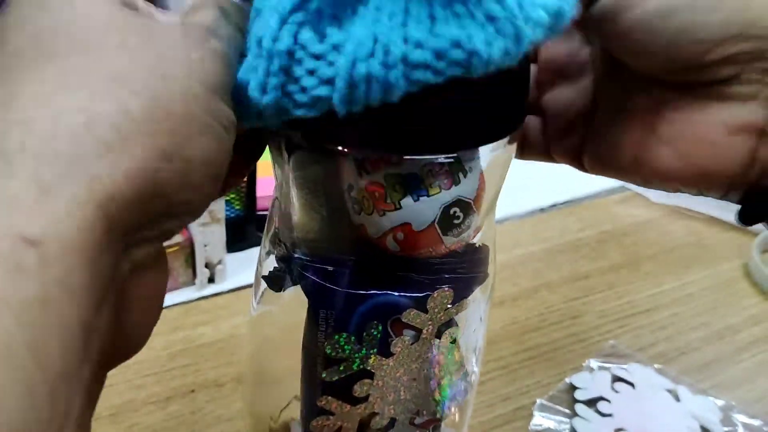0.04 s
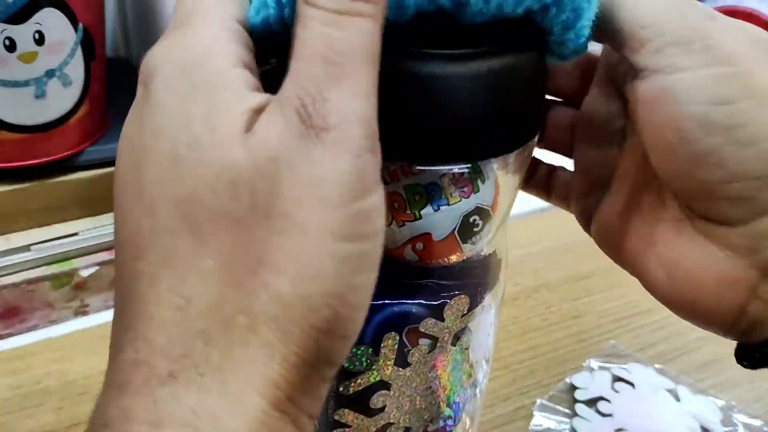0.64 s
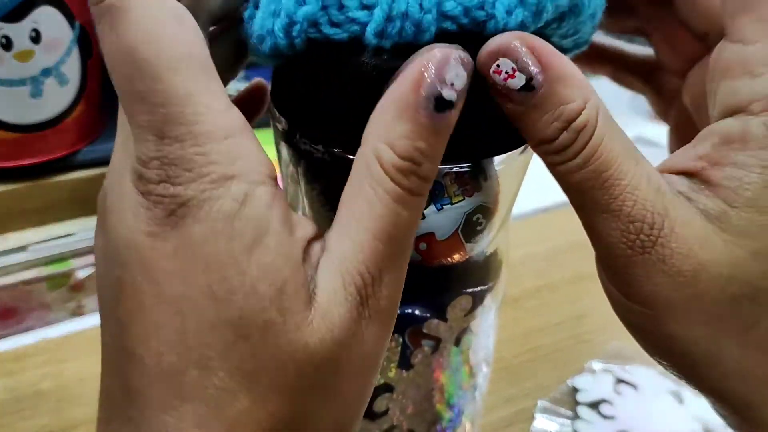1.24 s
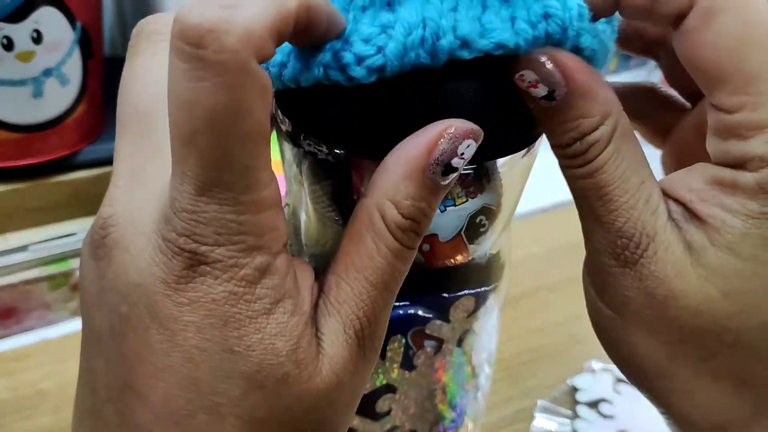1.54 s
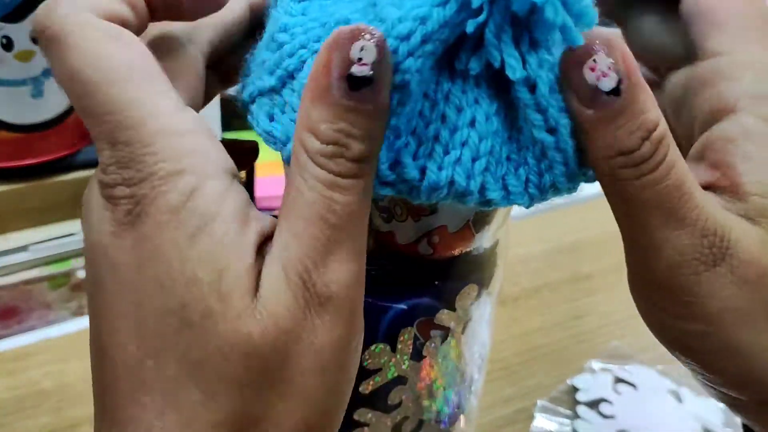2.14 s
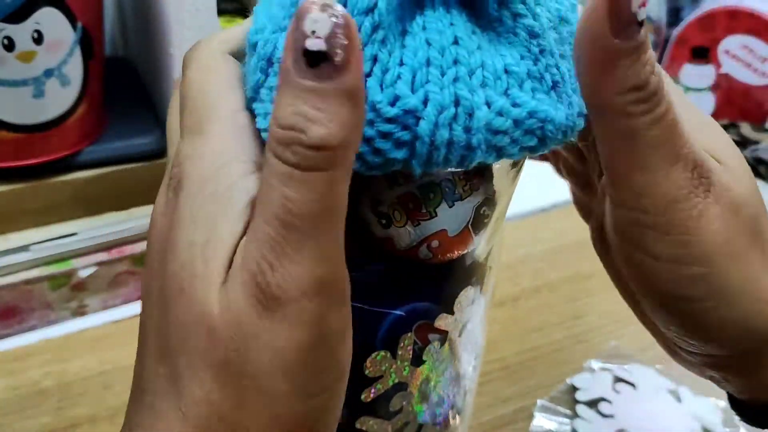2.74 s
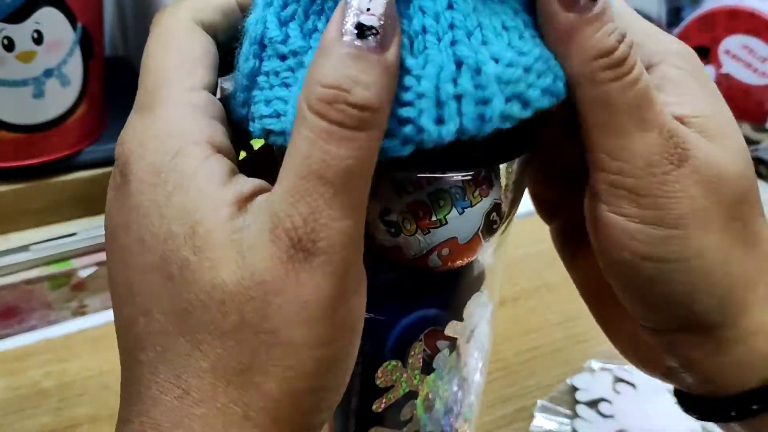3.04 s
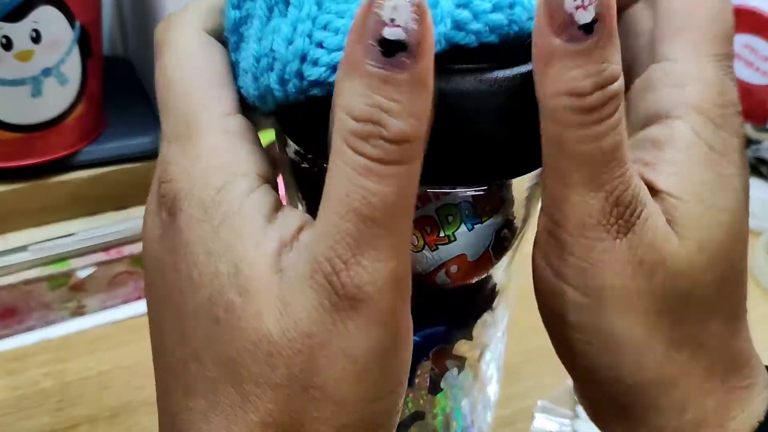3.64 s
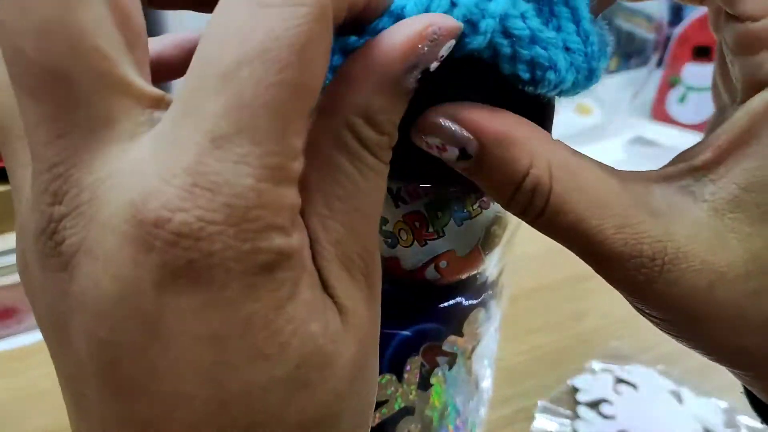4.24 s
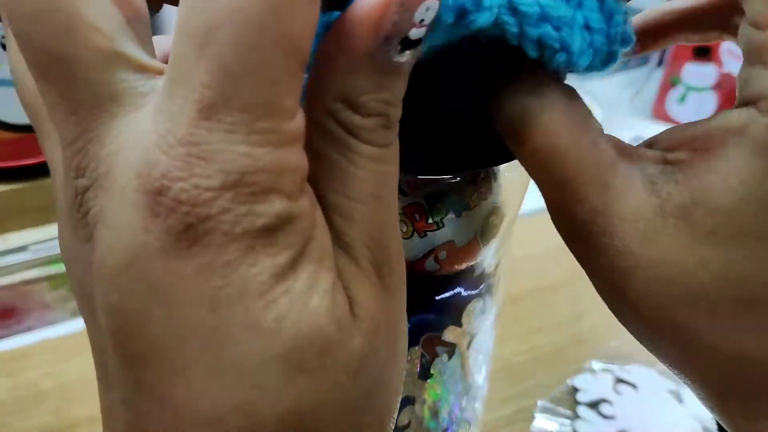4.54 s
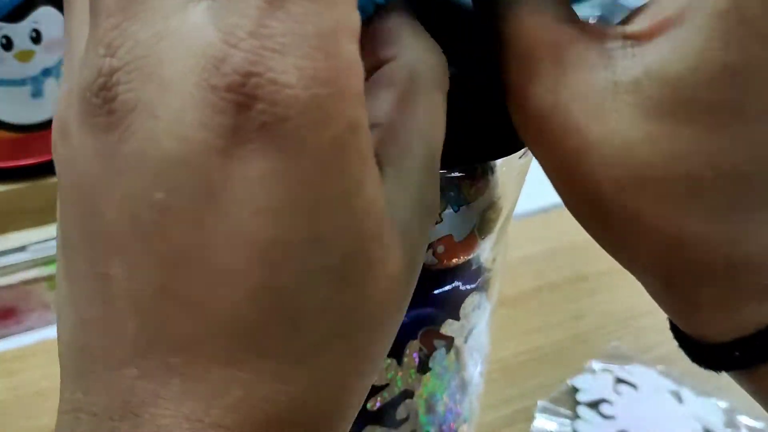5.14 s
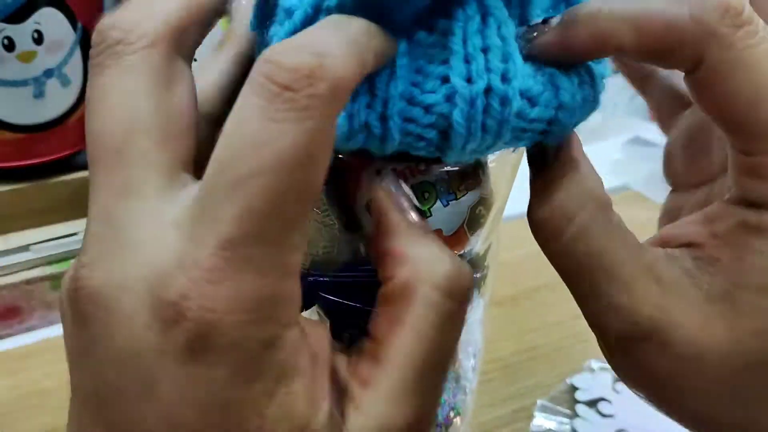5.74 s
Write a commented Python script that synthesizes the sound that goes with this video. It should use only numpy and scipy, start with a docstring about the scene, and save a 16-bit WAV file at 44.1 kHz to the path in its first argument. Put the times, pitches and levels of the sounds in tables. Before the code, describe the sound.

A jar wobbles on a desk in clusters of light thuds as a knitted cap softly rustles and fingernails click.

```python
"""Two hands tug a knitted wool cap over the plastic lid of a tall jar on a wooden desk, close by.
At once the jar rocks in a cluster of dull knocks, each impact exciting the modes of desk and jar and
shaking the contents, while friction makes the wool rustle and the base scuff. A lone knock and a nail
click follow at 1 s. From 1.8 s the clusters return, peak at 3.3 s and thin out to light knocks by 5.9 s.
Throughout, the small room holds a faint hiss and a low hum."""
import sys
import numpy as np
from scipy import signal
from scipy.fft import rfft, irfft
from scipy.io import wavfile
from scipy.ndimage import uniform_filter1d

SR = 44100
rng = np.random.default_rng(int(sys.argv[2]) if len(sys.argv) > 2 else 0)


def master(y):
    """Save y as 16-bit WAV."""
    cut = np.clip(np.atleast_2d(y).T, -1, 1)
    pcm = np.round(cut * 32767)  # scale
    wavfile.write(sys.argv[1], SR, pcm.astype(np.int16))


N = 259749
TIME = np.arange(N) / SR
RING_TIME = TIME[:SR // 3]
MEDIUM_KNOCK_DB = -30

# impacts of the jar's base on the desk: start_s, level_db, hardness_db, settle_s
IMPACTS = [(.0383, -42, -2, .01), (0.073, -37.5, -6, 0.045), (0.1513, -23, -2.5, 0.0042),
           (.166, -26.5, 0, 0.0039), (0.185, -23.5, -6, .004), (0.2011, -18.5, -2, 0.0089),
           (.217, -21, -5.5, 0.024), (0.2554, -19.5, -4.5, 0.015), (0.3477, -42.5, 2, 0.03),
           (0.9978, -24.5, 0.5, 0.0058), (1.808, -36.5, -2.5, 0.008), (1.8371, -24, -8, 0.017),
           (1.896, -34.5, -1, 0.0076), (1.963, -23, -6, 0.013), (2.083, -40.5, -2.5, 0.09),
           (2.1319, -29.5, -3, 0.041), (2.1892, -27, -8, 0.015), (2.2379, -33.5, -4.5, 0.019),
           (2.3371, -35.5, -5, 0.0036), (2.3637, -24.5, -8, 0.003), (2.3765, -24, -4.5, 0.0028),
           (2.3959, -27.5, -3, 0.0057), (2.562, -43.5, -3, 0.041), (2.6162, -41.5, -1, 0.0074),
           (2.796, -36, -7, 0.0082), (2.8209, -31, -1, 0.0094), (2.8406, -23, -7, 0.065),
           (2.8864, -29.5, -2, 0.023), (3.0456, -42, -10, 0.0051), (3.0996, -39.5, -2, 0.057),
           (3.138, -25.5, -7, 0.0044), (3.1525, -18.5, -5.5, 0.014), (3.3186, -20.5, -8, 0.0044),
           (3.333, -11.5, -3, 0.002), (3.3441, -9.5, 1.5, 0.0085), (3.396, -27, -3.5, 0.0062),
           (3.4378, -20.5, -2, 0.015), (3.684, -39.5, -1.5, 0.013), (3.7086, -26.5, -6.5, 0.015),
           (3.919, -32, -4, 0.0083), (4.0231, -37.5, -3, 0.0065), (4.097, -31, -2, 0.0061),
           (4.1647, -30.5, 2.5, 0.0087), (4.1758, -27.5, 5, 0.0067), (4.187, -21, -6.5, 0.0085),
           (4.425, -40.5, -5.5, 0.004), (4.592, -31, -3, 0.0094), (4.6044, -31, -1.5, 0.016),
           (4.7665, -34, -5, 0.021), (4.8293, -45.5, -5, .01), (4.86, -33, -2, 0.02),
           (4.9396, -37.5, 2, 0.01), (4.9592, -27, -10, 0.0036), (5.4411, -47, -2.5, 0.024),
           (5.6358, -34, -5.5, 0.0041), (5.671, -40, 5.5, 0.0053), (5.7922, -41.5, -4, 0.0069),
           (5.869, -35.5, -10, 0.011)]
# low modes of desk and jar together: pitch_hz, level_db, t60_s
BODY_MODES = [(216.7, -5.5, 0.1), (258.5, 0.5, 0.05), (303.2, 3.5, 0.052), (356.7, 0, 0.043),
              (435, -1, 0.045), (510.6, -6, 0.039)]
# higher modes, stronger in a hard contact: pitch_hz, level_db, t60_s
CLACK_MODES = [(550, -3, .04), (592, 1, .06), (668, -1, .04), (726, 0, .05), (800, -9, .04), (904, -9, .06),
               (1046, -18, .07), (1136, -19, .06), (1244, -17, .07)]


def knocks(thump_db=-1, clack_db=-10.5, wall_db=-23, tick_db=-32, crack_db=-19, flex_db=-17):
    """Impact excitation: each contact thumps the desk; harder ones put more into the high modes."""
    # modes of the jar's thin wall: pitch_hz, level_db, t60_s
    wall_modes = [(1683, -4, .07), (1820, 0, .08), (1963, -1, .08), (2120, -4, .06), (2300, -5, .06),
                  (2550, -3, .06), (2676, -2, .07), (3080, -4, .05), (3805, -6, .07), (4578, -11, .08)]
    # spectrum of the ticking contents: frequency_hz, density_db
    tick_spectrum = [(600, -12), (1100, 4.5), (1500, 7), (2000, 7.5), (2500, 5.5), (3100, -1), (3600, -7),
                     (5000, -48.5), (8500, -31.5), (10500, -18.5), (14000, -12.5)]
    # slow bending modes of the desk top: pitch_hz, level_db, t60_s
    flex_modes = [(91.3, -13, 0.02), (120.4, -4, 0.13)]
    soft_s, firm_s, cushion_db = .002, .0012, -27
    crack_band = signal.butter(2, (3300, 7000), "band", fs=SR, output="sos")
    out = np.zeros((2, N))
    for start_s, level_db, hardness_db, settle_s in IMPACTS:
        # the shifting grip alters the modes a little at each knock
        thump = early_echo(blow(BODY_MODES, soft_s, scatter_db=2.7, detune=.008))
        clack = blow(CLACK_MODES, firm_s, scatter_db=2, detune=.016)
        wall = blow(wall_modes, firm_s, scatter_db=2, detune=.004)
        rattle = diffuse(len(RING_TIME)) * decay(t60_s=.085) * (1 - np.exp(-RING_TIME / firm_s))
        tick = unit_rms(colour(rattle, tick_spectrum)) * rattle.std()
        bright_db = .96 * hardness_db + .044 * (level_db - MEDIUM_KNOCK_DB)
        bright = undb(bright_db) * (undb(wall_db) * wall + undb(tick_db) * tick)
        dull = undb(thump_db) * thump + undb(clack_db + hardness_db) * clack
        # the crack grows with the square of the force, so it stands out only in the heaviest blow
        crack = undb(level_db + crack_db) * signal.sosfilt(crack_band, rattle)
        contact = undb(level_db) * (dull + bright + crack)
        for delay_s, strength in rocking(settle_s):
            add(out, start_s + delay_s, strength * contact)
        # the hands carry the jar's weight, which limits how far a hard blow bends the desk
        flex = blow(flex_modes, contact_s=.0011, scatter_db=2.3, detune=.08)
        add(out, start_s, undb(min(level_db, cushion_db) + flex_db) * flex)
    return out


def rocking(settle_s, rebounds=4, gap_s=.0135, unevenness=.2):
    """Damped rocking: delays and strengths of a contact and its uneven, dying rebounds."""
    gaps_s = gap_s * np.exp(unevenness * rng.standard_normal(rebounds))
    delays_s = np.append(0, np.cumsum(gaps_s))
    return zip(delays_s, np.exp(-delays_s / settle_s))


def scuffs(scuff_db, gain_db=-4, drag_db=-21, slips_per_s=600, spread_db=3, clack_db=-18):
    """Stick-slip friction: tiny slips of the base, strongest around each knock, ring desk and jar."""
    drag_s, lag_s = .016, .0034
    dragging = np.zeros(N)
    for start_s, level_db, *_ in IMPACTS:
        near = np.abs(TIME - start_s) < 4 * drag_s
        dragging[near] += undb(level_db + drag_db) * bell(TIME[near] - start_s - lag_s, drag_s)
    slips = (rng.random(N) < slips_per_s / SR) * rng.choice([-1, 1], N)
    slips = unit_rms(slips * undb(spread_db * rng.standard_normal(N)))
    thump = early_echo(blow(BODY_MODES, contact_s=.004))
    clack = blow(CLACK_MODES, contact_s=.004)
    response = unit_rms(thump + undb(clack_db) * clack) / np.sqrt(len(RING_TIME))
    return convolve([slips * (undb(scuff_db + gain_db) + dragging)], response)


def wool(rustle_db, patchy_db=1.18, snags_per_s=700, snag_db=-9, spread_db=3, lid_db=-8):
    """Friction noise: countless fibres hiss over the lid; single stitches snag, let go and ring it."""
    # spectrum of wool brushing plastic: frequency_hz, density_db
    fibre_spectrum = [(590, -43.5), (1000, -22), (1140, -2.5), (1610, -10.5), (2070, -0.5), (2850, -1),
                      (3370, -4.5), (3720, -7.5), (7630, -10), (14000, -18)]
    # modes of the plastic lid: pitch_hz, level_db, t60_s
    lid_modes = [(1170, 13, 0.09), (2094, 6, 0.033), (2576, -2.5, 0.02), (3037, -8, 0.027),
                 (3520, -2, 0.038), (7500, -4.5, 0.024)]
    snags = (rng.random(N) < snags_per_s / SR) * undb(spread_db * rng.standard_normal(N))
    snags = unit_rms(snags * rng.standard_normal((2, N)))
    fibres = diffuse(N) * undb(patchy_db * wander(rate_hz=70)) + undb(snag_db) * snags
    # each mode wavers in level as the hands shift
    lid = sum(convolve(snags, ring([mode])) * undb(wander(rate_hz=10)) for mode in lid_modes)
    lid = np.diff(lid, prepend=0)  # a small shell radiates little bass
    return (unit_rms(colour(fibres, fibre_spectrum)) + undb(lid_db) * unit_rms(lid)) * undb(rustle_db)


def hands(hold_rustle_db=-83.5, hold_scuff_db=-78.5, jerk_db=-67):
    """Incoherent sources add in power: hold, pulls and jerks give the rustle and scuff levels in dB."""
    # pulls on the cap that drag the jar along: peak_s, rise_s, fall_s, rustle_db, scuff_db
    pulls = [(.07, 0.083, 0.084, -65, -54.5), (0.191, 0.083, .055, -54.5, -47),
             (.44, 0.095, 0.13, -67.5, -81), (1.13, .03, 0.098, -76, -58), (1.44, 0.026, 0.035, -74, -65),
             (1.83, 0.099, 0.072, -61.5, -65), (2.18, 0.36, 0.25, -72, -83),
             (2.647, .08, 0.016, -62.5, -74), (2.84, 0.42, 0.09, -70, -77), (3.16, 0.042, 0.058, -58, -74),
             (3.32, 0.074, 0.08, -55, -51), (3.5, 0.076, .11, -71.5, -71), (3.96, 0.026, 0.043, -70.5, -68),
             (4.36, .08, 0.029, -76, -74), (4.61, 0.04, 0.031, -63.5, -61), (4.79, 0.12, 0.051, -75, -54.5),
             (5.64, 0.072, 0.13, -70, -58.5), (5.83, 0.027, 0.051, -69.5, -63)]
    rustle_power, scuff_power = undb(hold_rustle_db) ** 2, undb(hold_scuff_db) ** 2
    for peak_s, rise_s, fall_s, rustle_db, scuff_db in pulls:
        pull = swell(peak_s, rise_s, fall_s)
        rustle_power += (undb(rustle_db) * pull) ** 2
        scuff_power += (undb(scuff_db) * pull) ** 2
    jerk = 0
    for start_s, level_db, *_ in IMPACTS:  # each knock jerks the lid against the wool
        strength = undb(jerk_db + .28 * (level_db - MEDIUM_KNOCK_DB))
        jerk = np.maximum(jerk, strength * swell(start_s + .0062, rise_s=.027, fall_s=.035))
    return 10 * np.log10(rustle_power + jerk ** 2), 10 * np.log10(scuff_power)


def skids(quality_factor=9):
    """Narrow-band friction noise: skin catches on the plastic in short, pitched scrapes."""
    # fingertip skids on the lid: peak_s, length_s, pitch_hz, level_db
    scrapes = [(0.043, 0.0095, 3550, -57.5), (0.078, 0.061, 2120, -60), (0.146, 0.015, 2160, -50),
               (0.387, 0.39, 1560, -73.5), (3.98, 0.082, 1530, -73), (5.602, 0.022, 1180, -63.5),
               (5.719, 0.051, 2170, -71), (5.826, 0.052, 3000, -70.5)]
    out = np.zeros((2, N))
    for peak_s, length_s, pitch_hz, level_db in scrapes:
        resonance = signal.iirpeak(pitch_hz, quality_factor, fs=SR)
        scrape = unit_rms(signal.lfilter(*resonance, diffuse(N)))
        out += undb(level_db) * scrape * bell(TIME - peak_s, length_s / 2)
    return out


def nail_taps():
    """A brief contact excites high modes: a fingernail clicks on the lid's rim."""
    # taps of the nail: start_s, level_db
    taps = [(0.2005, -54), (0.996, -48), (3.439, -51), (3.7058, -50), (4.177, -45.5)]
    # modes of the rim: pitch_hz, level_db, t60_s
    rim_modes = [(1770, 3.5, 0.058), (2060, -12, 0.054), (2396, 6, 0.038), (2700, -3, 0.098),
                 (2964, 2, 0.085), (3090, -6, 0.039)]
    out = np.zeros((2, N))
    for start_s, level_db in taps:
        click = blow(rim_modes, contact_s=.00059, scatter_db=.67, detune=.006)
        add(out, start_s, undb(level_db) * click)
    return out


def early_echo(x, delay_s=.002843, share=.6):
    """Comb filtering: the echo from a hard surface close by hollows the bass near 175 and 525 Hz."""
    echo = np.pad(x, ((0, 0), (int(delay_s * SR), 0)))[:, :x.shape[1]]
    return (x + share * echo) / (1 + share)


def reverberation(x, wet_db=-20, t60_s=.13, build_up_s=.01):
    """Diffuse reflections build up and are soon absorbed in a small, full room."""
    tail = diffuse(len(RING_TIME)) * decay(t60_s) * (1 - bell(RING_TIME, build_up_s))
    return undb(wet_db) * convolve(x, unit_rms(tail) / np.sqrt(len(RING_TIME)))


def room_tone(hiss_db=-68.06, hum_gain_db=-1, mains_hz=120, mains_db=-78):
    """The noise floor: steady broadband hiss, a wavering low hum and a trace of mains."""
    # swells of the low hum: peak_s, half_length_s, pitch_hz, level_db
    hum_swells = [(0.624, 0.28, 45.2, -68.5), (3.633, 0.86, 53, -70), (4.898, .22, 55.5, -66),
                  (5.75, 0.31, 55, -62)]
    # spectrum of the room's hiss: frequency_hz, density_db
    hiss_spectrum = [(12, -20), (20, -4), (52, -10.5), (81, -4.5), (125, -16.5), (195, -17), (286, -12.5),
                     (337, -17), (536, -22), (582, -21.5), (1480, -30.5), (1840, -31), (2490, -35),
                     (3020, -35.5), (14000, -41)]
    hum = sum(undb(level_db) * bell(TIME - peak_s, half_length_s) * np.sin(2 * np.pi * pitch_hz * TIME)
              for peak_s, half_length_s, pitch_hz, level_db in hum_swells)
    hum *= undb(hum_gain_db + wander(rate_hz=11))
    mains = undb(mains_db + wander(rate_hz=8.8)) * np.sin(2 * np.pi * mains_hz * TIME)
    hiss = undb(hiss_db) * unit_rms(colour(diffuse(N), hiss_spectrum))
    return hiss + np.sqrt(2) * (hum + mains)


def blow(modes, contact_s, scatter_db=0, detune=0):
    """A finite contact time softens the onset of the ringing modes; peak 1."""
    sound = ring(modes, scatter_db, detune) * (1 - bell(RING_TIME, contact_s))
    return sound / np.abs(sound).max()


def ring(modes, scatter_db=0, detune=0, split_hz=590, lead_s=-.00017):
    """Modal superposition: damped sines, the low ones nearly in phase in both channels, the high not."""
    out = 0
    for k, (pitch_hz, level_db, t60_s) in enumerate(modes):
        level_draw, pitch_draw = rng.standard_normal(2)
        high = min((pitch_hz / split_hz) ** 4, 1)
        offset = high * (-1) ** k * np.pi / 4.26 + (1 - high) * np.pi * pitch_hz * lead_s
        phase = 2 * np.pi * pitch_hz * (1 + detune * pitch_draw) * RING_TIME
        stereo_tone = np.sin([phase + offset, phase - offset])
        out -= undb(level_db + scatter_db * level_draw) * stereo_tone * decay(t60_s)
    return out


def diffuse(size):
    """Diffuse-field noise: the two channels are partly alike in the bass, unrelated in the treble."""
    # likeness of the channels: frequency_hz, correlation
    coherence = [(60, 0.44), (300, 0.67), (700, 0.12), (1500, 0.12), (5000, .03), (14000, .02)]
    mid, side = rfft(rng.standard_normal((2, size)))
    alike = along(coherence, np.arange(len(mid)) * SR / size)
    mid, side = mid * np.sqrt(1 + alike), side * np.sqrt(1 - alike)
    return unit_rms(irfft([mid + side, mid - side], size))


def colour(x, spectrum):
    """Spectral shaping, with a roll-off of 12 dB an octave below the lowest point."""
    hz = np.arange(x.shape[-1] // 2 + 1) * SR / x.shape[-1]
    roll_off = np.minimum(hz / spectrum[0][0], 1) ** 2
    return irfft(rfft(x) * undb(along(spectrum, hz)) * roll_off, x.shape[-1])


def along(points, hz):
    """Interpolation of (frequency_hz, value) points on a logarithmic frequency axis."""
    frequency_hz, value = np.transpose(points)
    return np.interp(np.log(hz + 1), np.log(frequency_hz), value)


def wander(rate_hz):
    """Slow random modulation: smoothed noise of rms 1."""
    hold = int(SR / rate_hz)
    steps = np.repeat(rng.standard_normal(N // hold + 1), hold)[:N]
    return unit_rms(uniform_filter1d(uniform_filter1d(steps, hold), hold))


def swell(peak_s, rise_s, fall_s, release_power=1.2):
    """Exponential growth to 1, then a steepening fall as the hand lets go."""
    away_s = np.abs(TIME - peak_s)
    return np.exp(-np.where(TIME < peak_s, away_s / rise_s, (away_s / fall_s) ** release_power))


def decay(t60_s):
    """Exponential damping, 60 dB in t60_s."""
    return np.exp(-np.log(1000) * RING_TIME / t60_s)


def bell(time_s, width_s):
    """Gaussian envelope, 1 at time zero."""
    return np.exp(-(time_s / width_s) ** 2)


def convolve(x, response):
    """A linear system's output, given its impulse response."""
    return signal.fftconvolve(x, response, axes=1)[:, :N]


def add(out, start_s, sound):
    """Superposition of a sound on the mix from a given time."""
    start = min(int(start_s * SR), N)
    out[:, start:start + sound.shape[1]] += sound[:, :N - start]


def undb(db):
    """Decibels to amplitude ratio."""
    return 10 ** (np.asarray(db) / 20)


def unit_rms(x):
    """Normalisation to rms 1."""
    return x / np.sqrt(np.mean(x ** 2))


def scene(lowest_hz=60):
    """Jar, cap and room superpose; the jar's sounds are cut below the lowest_hz, so they carry no deep bass."""
    rustle_db, scuff_db = hands()
    bass_cut = signal.butter(2, lowest_hz, "high", fs=SR, output="sos")
    jar = signal.sosfilt(bass_cut, knocks() + scuffs(scuff_db))
    direct = jar + wool(rustle_db) + skids() + nail_taps()
    return direct + reverberation(direct) + room_tone()


def record(dry):
    """Band limiting: a steep low-pass removes the highest treble."""
    cutoff_hz = 14350
    return signal.sosfilt(signal.ellip(10, .2, 70, cutoff_hz, fs=SR, output="sos"), dry)


dry = scene()
out = record(dry)
master(out)
```